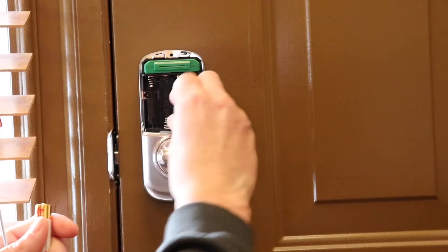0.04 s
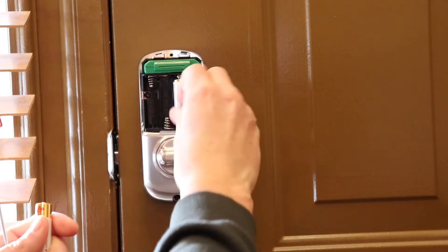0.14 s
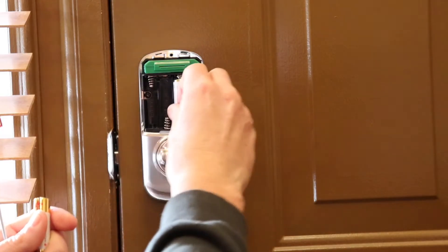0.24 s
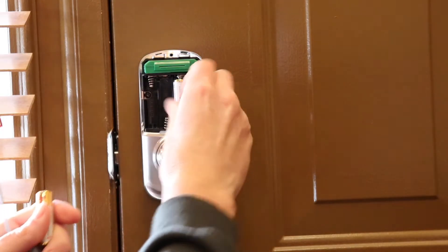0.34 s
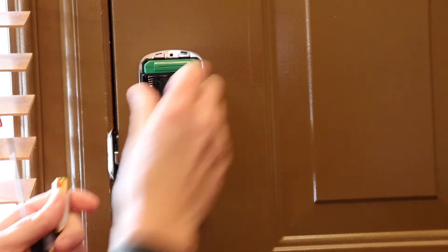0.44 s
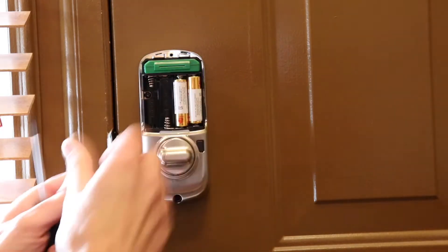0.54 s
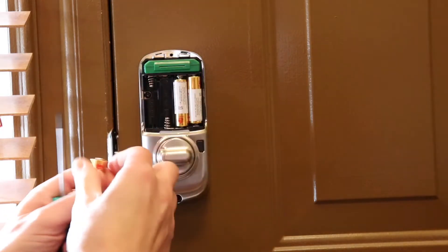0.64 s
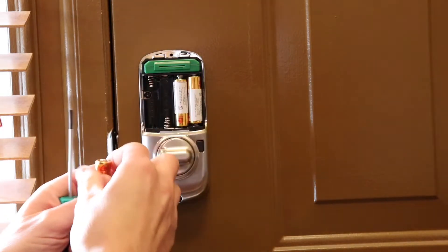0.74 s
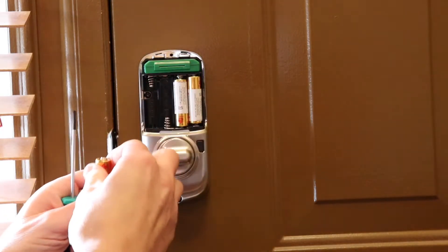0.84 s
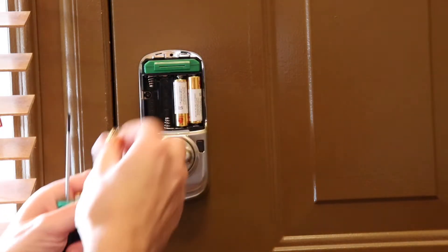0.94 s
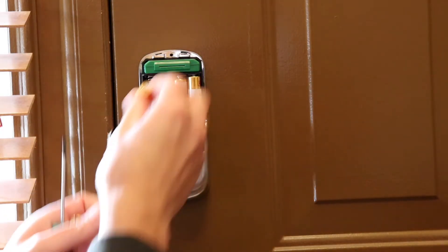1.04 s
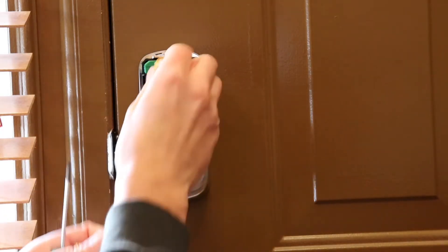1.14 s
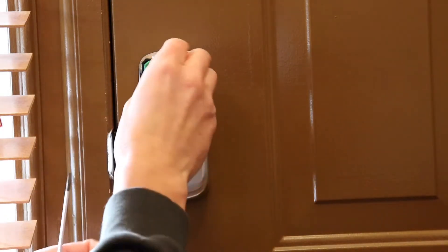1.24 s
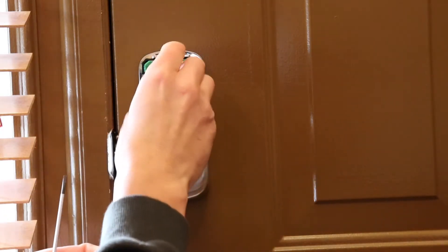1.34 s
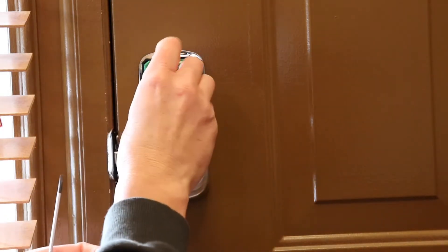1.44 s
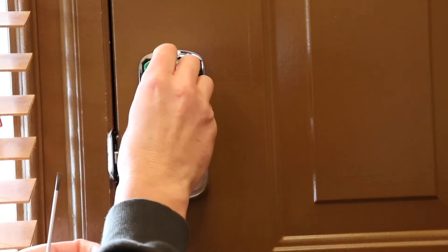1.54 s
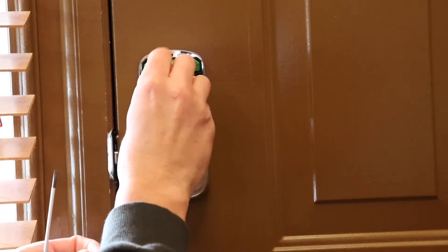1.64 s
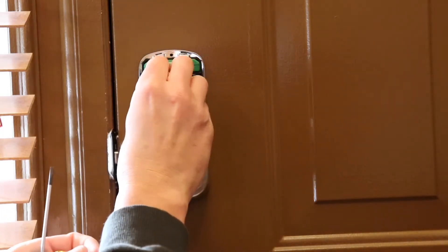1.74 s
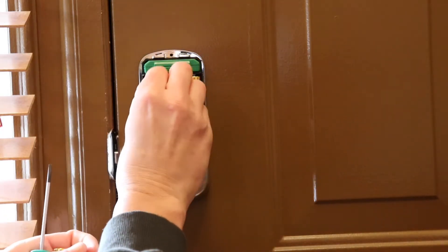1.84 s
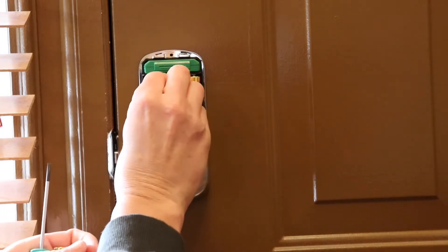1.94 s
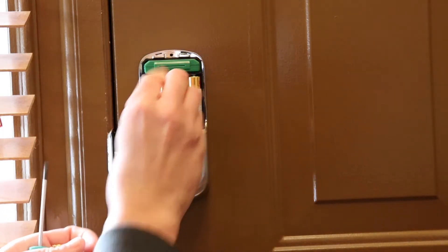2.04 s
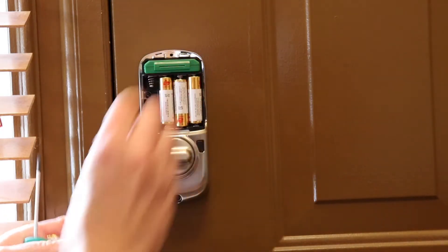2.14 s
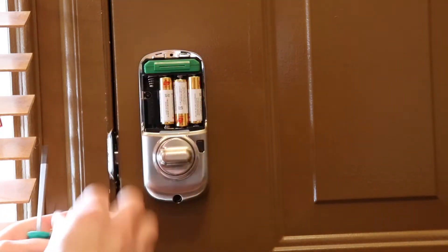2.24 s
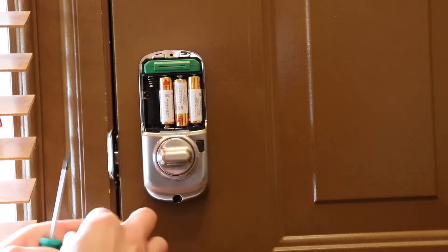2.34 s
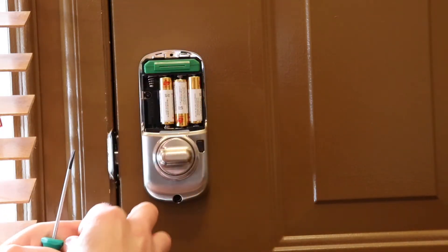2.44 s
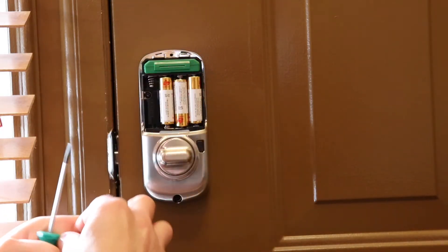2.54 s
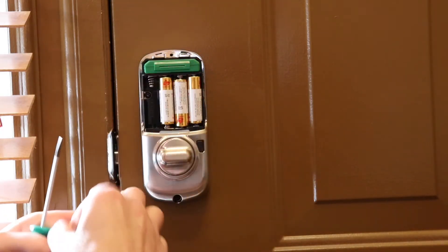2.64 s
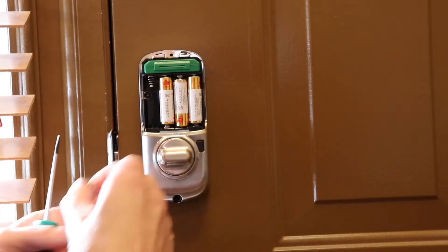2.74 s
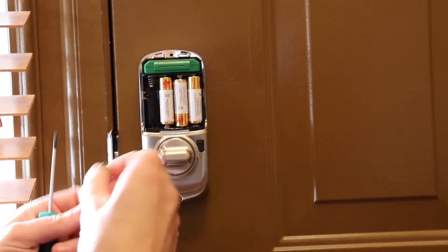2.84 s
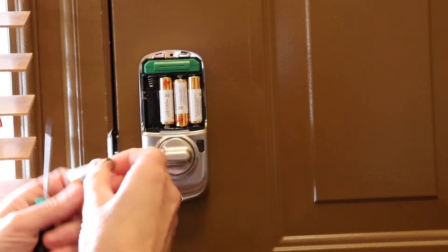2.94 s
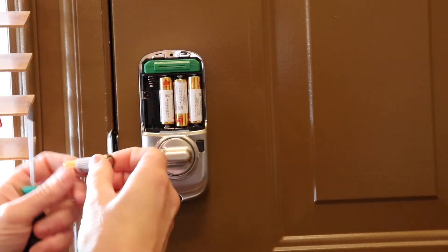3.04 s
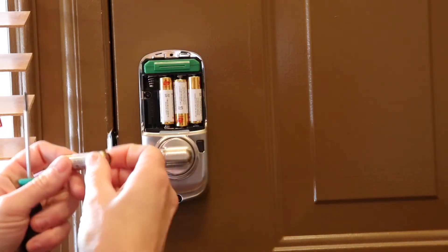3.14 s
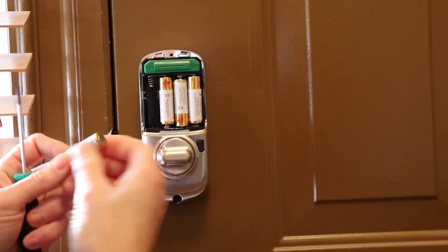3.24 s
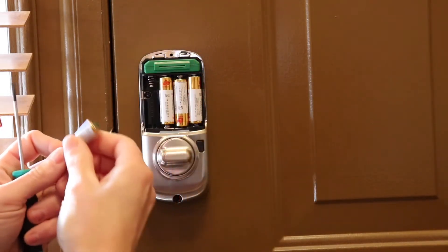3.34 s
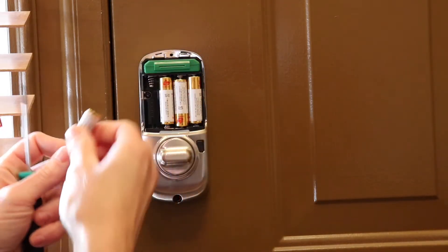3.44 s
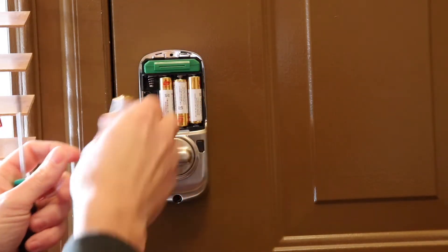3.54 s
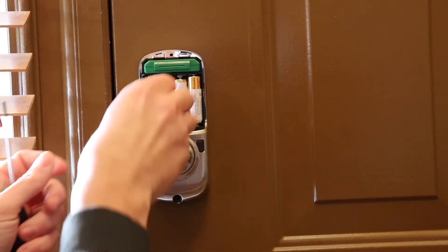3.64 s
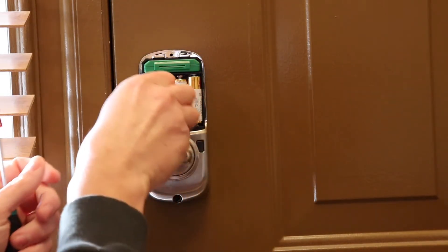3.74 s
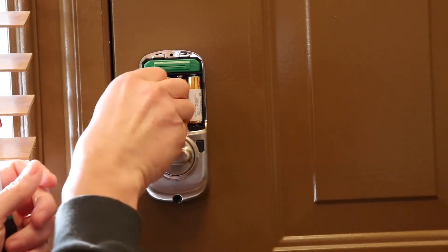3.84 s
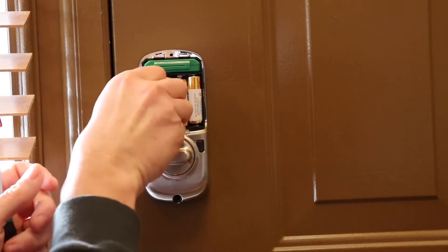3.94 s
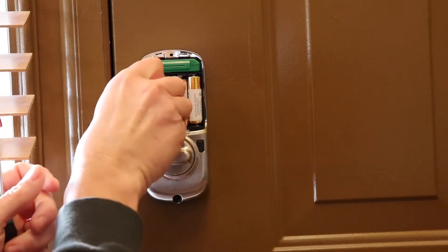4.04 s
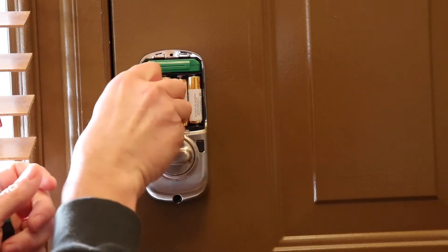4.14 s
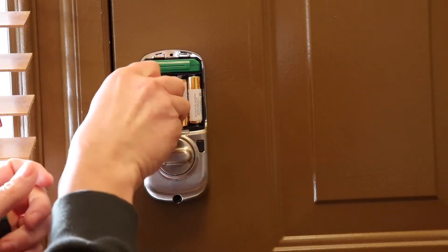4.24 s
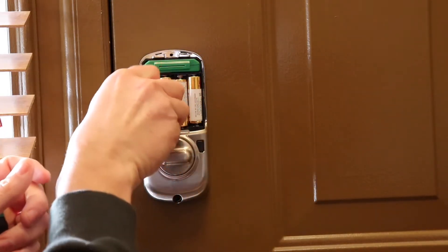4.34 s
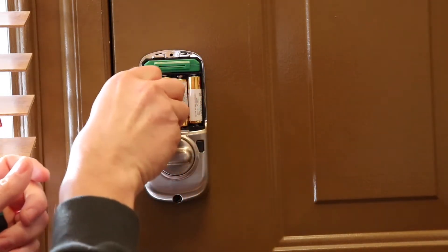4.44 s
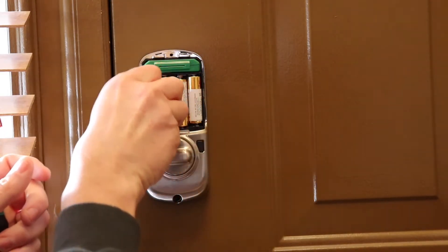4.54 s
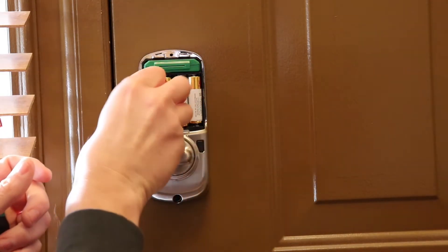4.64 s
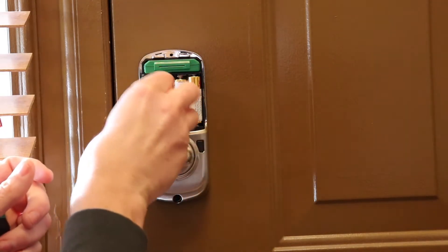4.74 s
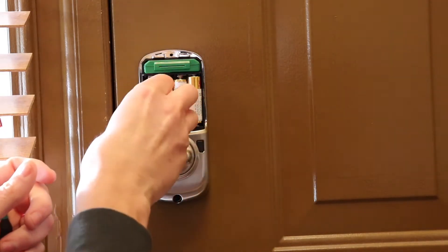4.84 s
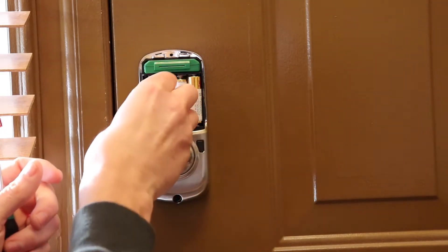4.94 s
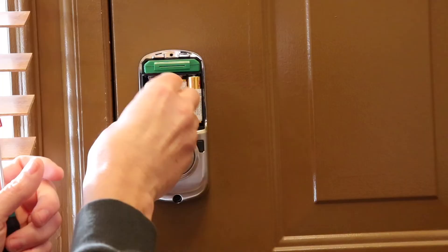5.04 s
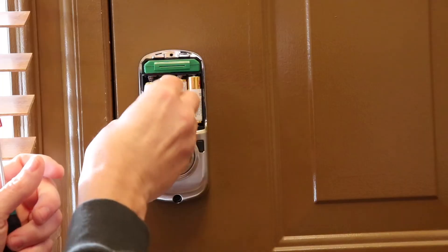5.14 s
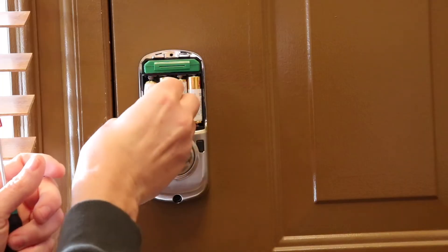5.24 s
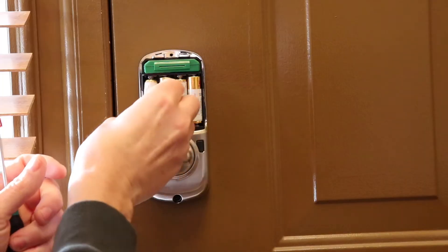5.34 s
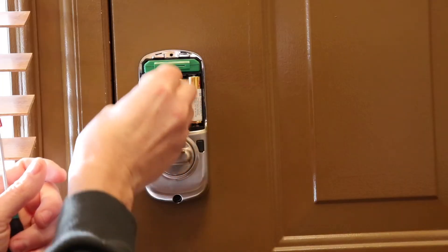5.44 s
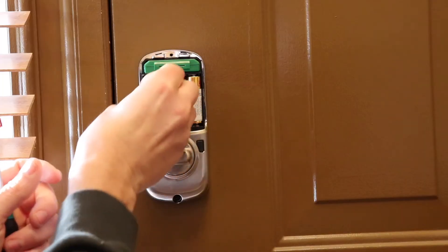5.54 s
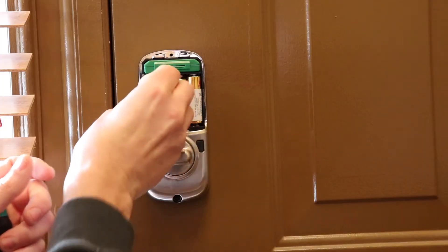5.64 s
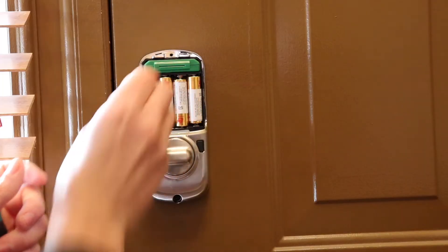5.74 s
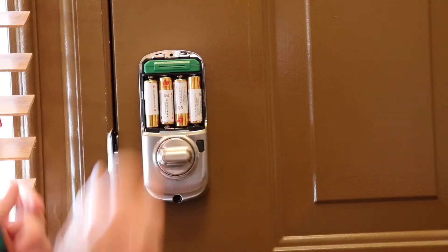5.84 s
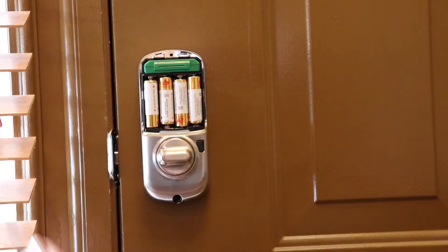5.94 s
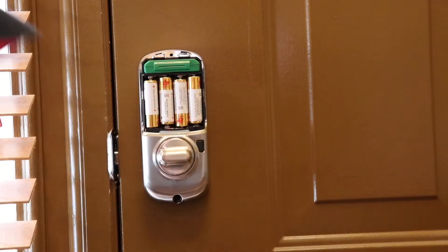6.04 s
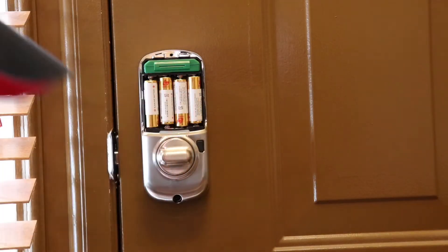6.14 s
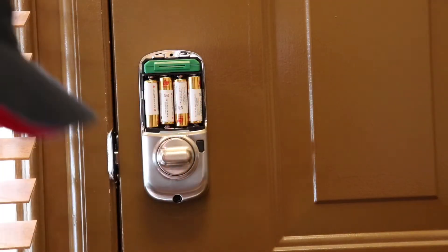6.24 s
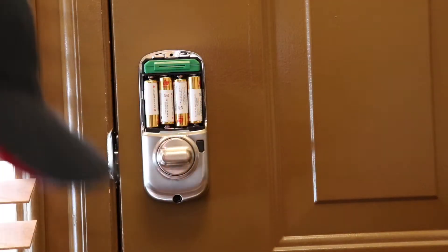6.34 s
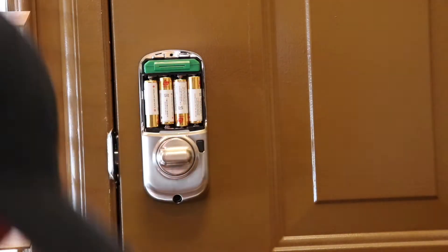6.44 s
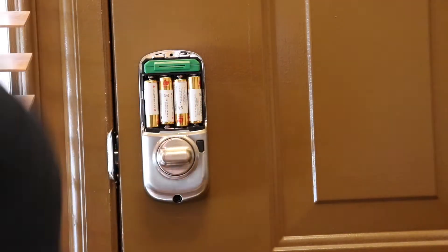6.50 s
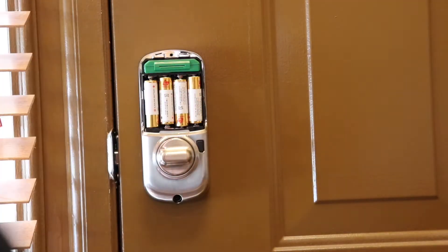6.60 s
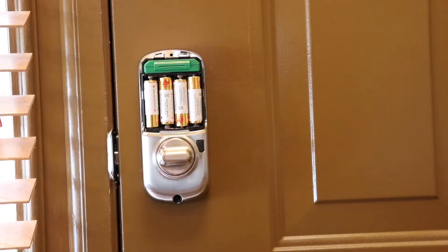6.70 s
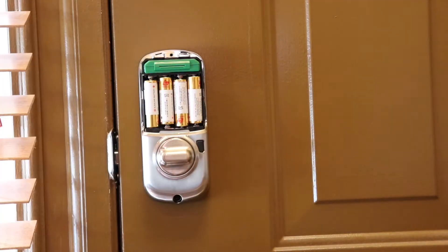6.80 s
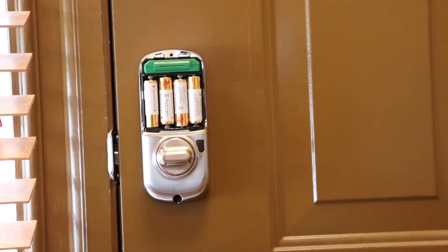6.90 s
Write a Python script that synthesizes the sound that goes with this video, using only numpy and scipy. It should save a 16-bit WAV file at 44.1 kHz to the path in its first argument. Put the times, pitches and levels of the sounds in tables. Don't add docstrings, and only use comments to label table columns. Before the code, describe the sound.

Close stereo pickup of a door lock being loaded with batteries: brief, crisp plastic snaps separated by quiet gaps, small coil squeaks and ticks, low knocks through the wooden panel. The third snap is bright and metallic; the fourth is a loud cluster with a heavy push. Short hallway echoes follow. Soft cloth rustling ends it, over steady low hiss and a barely audible high whine.

```python
import sys
import numpy as np
from scipy import signal
from scipy.io import wavfile

SR = 44100
rng = np.random.default_rng(int(sys.argv[2]) if len(sys.argv) > 2 else 0)


def attenuation_scalar(level_db):
    decades = np.asarray(level_db, float) / 20
    return 10 ** decades


def int16_out(signal):
    q = np.round(np.clip(np.atleast_2d(signal).T, -1, 1) * 32767)
    wavfile.write(sys.argv[1], SR, q.astype(np.int16))


N = 307314


def rms_one(x):
    return x / np.sqrt(np.mean(x ** 2) + 1e-20)


def peak_one(x):
    return x / np.max(np.abs(np.atleast_2d(x)[0]))


def at_hz(points, hz):
    table = np.array(points)
    return np.interp(np.log(hz), np.log(table[:, 0]), table[:, 1])


def add(track, s, sound):
    i = round(s * SR)
    track[..., i:i + sound.shape[-1]] += sound[..., :N - i]


EDGES_HZ = 22 * 2 ** np.arange(0, 9.8, 0.5)


def stereo_bands(size, likeness, gain):
    out, white = 0, rng.standard_normal((2, 2, size))
    for k, (low, high) in enumerate(zip(EDGES_HZ, EDGES_HZ[1:])):
        band = signal.butter(2, [low, high], "band", fs=SR, output="sos")
        mid, side = signal.sosfilt(band, white[k % 2])
        hz = np.sqrt(low * high)
        alike = np.sqrt(np.clip(at_hz(likeness, hz), 0, 1))
        stereo = np.sqrt(1 + alike) * mid + np.sqrt(1 - alike) * side * [[1], [-1]]
        out = out + gain(hz) * stereo
    return out


# f/Hz, level/dB
HISS_COLOUR = [(15, -38.5), (28, -3.5), (180, -2.5), (460, -5), (1200, -9), (3430, -15), (8140, -19),
               (16000, -29)]
# f/Hz, likeness (0 to 1)
HISS_LIKENESS = [(60, 0.35), (240, 0.18), (950, 0.11), (3770, 0.05), (15000, 0.021)]
# f/Hz, level/dB (rms)
WHINES = [(8000, -83), (8220, -80), (8280, -80.5)]


def floor():
    hiss_db = -56.5 + 1.5
    hiss = rms_one(stereo_bands(N, HISS_LIKENESS, lambda hz: attenuation_scalar(at_hz(HISS_COLOUR, hz))))
    t = np.arange(N) / SR
    whine = sum(np.sqrt(2) * attenuation_scalar(db) * np.sin(2 * np.pi * hz * t) for hz, db in WHINES)
    return attenuation_scalar(hiss_db) * hiss + whine


# f/Hz, t60/s
HALL_DECAY = [(100, 0.73), (420, 0.48), (1100, 0.57), (2900, 0.46), (7700, 0.42), (14000, .22)]
# f/Hz, level/dB
HALL_TONE = [(100, 2), (500, 1.6), (1500, 2.5), (4000, -3), (9000, -3), (15000, -9.5)]
# f/Hz, likeness (0 to 1)
DIFFUSE_LIKENESS = [(60, 0.98), (240, 0.88), (950, 0.14), (3770, 0.097), (15000, 0.17)]


def hallway(x):
    hall_db, far_wall_db, far_wall_s, far_spread_s = -26 - 13.5, -6.5, 0.064, 0.0089
    t = np.arange(30000) / SR
    build_up = 1 - np.exp(-t / 0.021)
    echo = attenuation_scalar(far_wall_db) * np.exp(-0.5 * ((t - far_wall_s) / far_spread_s) ** 2)
    fading = lambda hz: attenuation_scalar(at_hz(HALL_TONE, hz) - 60 * t / at_hz(HALL_DECAY, hz))
    tail = stereo_bands(len(t), DIFFUSE_LIKENESS, fading)
    return signal.fftconvolve(x[None], attenuation_scalar(hall_db) * (build_up + echo) * tail)[:, :N]


def rubbing(strokes, rise_db, fall_db, colour, puff_db):
    s, db = np.transpose(strokes)[:, :, None]
    start = s.min() - 0.25
    t = np.arange(start, s.max() + 0.3, 1 / SR)
    strokes_db = db - rise_db * np.clip(s - t, 0, None) - fall_db * np.clip(t - s, 0, None)
    level_db = np.max(strokes_db, axis=0)
    puffs = np.interp((t - start) * 30, np.arange(60), rng.standard_normal(60))
    noise = rms_one(stereo_bands(len(t), DIFFUSE_LIKENESS, lambda hz: attenuation_scalar(at_hz(colour, hz))))
    out = np.zeros((2, N))
    add(out, start, attenuation_scalar(level_db + puff_db * puffs) * noise)
    return out


# t/s, level/dB
SLEEVE_SWEEPS = [
    (5.96, -56),
    (6.08, -54),
    (6.33, -51.5),
    (6.4, -52.5),
    (6.52, -50.5),
    (6.64, -53.5),
    (6.8, -56),
    (6.95, -58),
]
# f/Hz, level/dB per Hz
CLOTH_COLOUR = [(120, -34), (200, -5.5), (560, -4), (1050, -12.5), (1330, -8), (1490, -11), (1980, -8.5),
                (15000, -25.5)]


def sleeve():
    return rubbing(SLEEVE_SWEEPS, 69, 47, CLOTH_COLOUR, puff_db=1.5)


# t/s, level/dB
FINGER_RUBS = [
    (4.55, -56),
    (4.7, -56.5),
    (4.85, -61.5),
    (5.028, -61),
    (5.22, -54),
    (5.32, -53),
    (5.56, -52),
    (5.68, -52.5),
    (5.8, -60.5),
]
# f/Hz, level/dB per Hz
FINGER_TONE = [(18, -19.5), (30, -3), (58, -1.5), (473, -12.5), (751, -3), (955, -28.5), (2500, -18),
               (3400, -70)]


def fingers():
    return rubbing(FINGER_RUBS, 200, 125, FINGER_TONE, puff_db=2.2)


# t/s, level/dB (peak)
HAND_LEANS = [
    (1.45, -52),
    (5.058, -46),
    (5.125, -48),
    (5.25, -45),
    (5.3, -44),
    (5.367, -27),
    (5.668, -39),
    (5.708, -42),
    (5.75, -47),
    (5.82, -51),
]


def leaning():
    sway_hz, sway_s = 52, 0.012
    out, t = np.zeros(N), np.arange(-2000, 2000) / SR
    sway = np.exp(-0.5 * (t / sway_s) ** 2) * np.cos(2 * np.pi * sway_hz * t)
    for s, db in HAND_LEANS:
        add(out, s + t[0], attenuation_scalar(db) * sway)
    return out


# t/s, level/dB (peak)
DOOR_PUSHES = [(0.054, -33), (0.08, -19), (0.095, -23.5), (0.113, -21.5), (1.588, -36.5), (1.657, -30.5),
               (1.796, -28), (1.816, -25.5), (2.051, -60), (3.756, -37.5), (3.9, -36.5), (4.09, -42.5),
               (4.296, -34.5), (4.33, -41), (4.41, -34.5), (4.53, -48), (5.02, -45), (5.05, -42.5),
               (5.12, -42.5), (5.19, -37.5), (5.244, -37), (5.298, -41.5), (5.357, -22), (5.385, -29),
               (5.409, -22), (5.641, -44), (5.661, -37), (5.7, -57)]
# f/Hz, level/dB, t60/s
DOOR_MODES = [(43.3, -2.5, 0.11), (65.3, -1.9, 0.073), (122, -8, 0.13), (158.8, -3.5, .12), (217, 1.5, 0.1),
              (281.3, 1, 0.11), (358.4, -1.5, 0.092), (445.6, -1, 0.16), (533, 2, 0.093), (760, -2, 0.076)]
THUD_BAND = signal.butter(2, [40, 900], "band", fs=SR, output="sos")


def door():
    soft_hz, thud_db, thud_s = 378.3, -8.5, 0.028
    out, t = np.zeros(N), np.arange(SR // 4) / SR
    swell = 1 - np.exp(-t / 0.0076)
    for s, db in DOOR_PUSHES:
        chance = rng.standard_normal((len(DOOR_MODES), 2)) * [1.5, 1]
        modes = 0
        for (hz, mode_db, t60), (extra_db, phase) in zip(DOOR_MODES, chance):
            strength = attenuation_scalar(mode_db + extra_db - 60 * t / t60) / (1 + (hz / soft_hz) ** 2)
            modes = modes + strength * np.sin(2 * np.pi * hz * t + phase)
        thud = rms_one(signal.sosfilt(THUD_BAND, rng.standard_normal(len(t)))) * np.exp(-t / thud_s)
        add(out, s, attenuation_scalar(db - 4.5) * (peak_one(modes * swell) + attenuation_scalar(thud_db) * thud * swell))
    return out


def resonance(x, hz, width_hz):
    r = np.exp(-np.pi * width_hz / SR)
    feedback = [1, -2 * r * np.cos(2 * np.pi * hz / SR), r * r]
    return signal.lfilter([(1 - r * r) / 2, 0, (r * r - 1) / 2], feedback, x)


def body(x, peaks):
    return sum((-1) ** k * attenuation_scalar(db) * resonance(x, hz, width) for k, (hz, width, db) in enumerate(peaks))


def spread(rung, plain, width):
    mid, side = peak_one(rung)[:2]
    click = plain * np.sqrt(np.sum(mid ** 2) / np.sum(plain ** 2))
    return np.array([mid + width * side, mid - width * side, 0.34 * mid + 0.67 * click])


# f/Hz, width/Hz, level/dB
HOUSING_PEAKS = [(740, 120, -4.5), (1508, 160, -3), (1710, 240, -6.5), (2048, 110, -3.5)]
# f/Hz, width/Hz, level/dB
CONTACT_PEAKS = [(4120, 590, 5.5), (6690, 750, 3.5), (7700, 720, -5), (9230, 320, -0.5), (11500, 420, -30),
                 (11900, 1100, -22)]
BAY_BAND = signal.butter(3, [2700, 5600], "band", fs=SR, output="sos")
HOUSING_BAND = signal.butter(2, [550, 2300], "band", fs=SR, output="sos")
METAL_BAND = signal.butter(2, [5000, 11500], "band", fs=SR, output="sos")


def contact(envelope, db, bay, housing, housing_db, contacts_db):
    force = envelope * rng.standard_normal((3, len(envelope)))
    force[0, 12] += 3.5
    force[2] = np.arange(len(envelope)) == 12
    wide, dull, bright = [signal.sosfilt(band, force) for band in (BAY_BAND, HOUSING_BAND, METAL_BAND)]
    bay_ring = resonance(resonance(force, *bay), *bay)
    air = spread(bay_ring + 0.15 * wide, wide[2], 0.48)
    plastic = spread(body(dull, housing) + 0.18 * dull, dull[2], 0.45)
    metal = spread(body(bright, CONTACT_PEAKS) + 0.38 * bright, bright[2], 0.49)
    return attenuation_scalar(db) * (air + attenuation_scalar(housing_db) * plastic + attenuation_scalar(contacts_db) * metal)


T_MS = np.arange(2600) / SR * 1000


def rattle(ms):
    return (1 - np.exp(-T_MS / 0.27)) * (np.exp(-T_MS / abs(ms)) + 0.06 * np.exp(-T_MS / 7))


def scrape(ms):
    return (1 - np.exp(-T_MS / 0.57)) * np.exp(-np.clip(T_MS - ms, 0, None) / 1.6)


# from t/s, f/Hz
BAY_SLOTS = [
    (0, 3050),
    (1.0, 3490),
    (3.0, 3200),
    (4.45, 3370),
    (5.0, 3350),
    (5.38, 2950),
]


def bay_hz(s):
    return [hz for start, hz in BAY_SLOTS if start <= s][-1]


# t/s, f/Hz, level/dB, t60/s
COIL_RINGS = [
    (1.589, 1497, -41.5, .28),
    (1.669, 1497, -44, .26),
    (4.532, 3370, -47.5, .42),
]
# t/s, f/Hz, level/dB, t60/s
END_CLIP_RINGS = [
    (5.3921, 6750, -6.5, .009),
    (4.2902, 6850, -18.5, 0.017),
    (1.8136, 3450, -5.5, .006),
]


def metal_rings():
    out, t = np.zeros((3, N)), np.arange(SR // 2) / SR
    for s, hz, db, t60 in [*COIL_RINGS, *END_CLIP_RINGS]:
        beating = np.sin(2 * np.pi * hz * t) + 0.5 * np.sin(2 * np.pi * (hz + 19) * t)
        add(out, s, attenuation_scalar(db - 60 * t / t60) * beating * np.array([[1], [1], [0.3]]))
    return out


# t/s, bay level/dB (peak), housing f/Hz, housing level/dB (relative), rattle decay/ms
HOUSING_KNOCKS = [(1.5888, -32.5, 1425, 7, 2.9), (3.7504, -58.5, 840, 17.5, 3.1),
                  (3.879, -56, 718, 12.5, 7.3), (3.9, -40, 832, 8, 5.2), (4.085, -40, 778, 12.5, 6.3),
                  (4.4069, -23.5, 1970, -3, 5.3), (5.125, -55, 665, 9, 2.5), (5.191, -60.5, 608, 19, 6.3),
                  (5.245, -71, 740, 25.5, 6.2), (5.375, -27, 746, 7, 3.4), (5.409, -30, 760, 9.5, 3.7),
                  (5.465, -33, 720, 5, 9)]


def knocks():
    out = np.zeros((3, N))
    for s, db, hz, housing_db, ms in HOUSING_KNOCKS:
        housing = [*HOUSING_PEAKS, (hz, 180, 6), (2400, 900, 1.5)]
        add(out, s, contact(rattle(ms), db, (3050, 1150), housing, housing_db, housing_db - 26))
    return out


# t/s, bay level/dB (peak), contacts level/dB (relative), length/ms
COIL_SQUEAKS = [
    (1.49, -44, -5.5, 13),
    (1.805, -26, -7.5, 3.8),
    (4.145, -48, -11, 39),
    (4.18, -51.5, -11, 29),
    (4.5232, -24.5, -0.5, 15.2),
    (4.8514, -56, -9, 12),
    (4.89, -55.5, -5.5, 24),
    (5.3468, -31.5, -4, 17),
    (1.797, -34, -9.5, 7.8),
    (5.37, -35.5, -10, 12),
]


def squeaks():
    out = np.zeros((3, N))
    for s, db, contacts_db, ms in COIL_SQUEAKS:
        housing_db = -15 - contacts_db
        add(out, s, contact(scrape(ms), db, (bay_hz(s), 120), HOUSING_PEAKS, housing_db, contacts_db))
    return out


# t/s, bay level/dB (peak), housing level/dB (relative), length/ms
SPRING_SLIDES = [
    (0.073, -27, -4, 1.8),
    (0.1095, -18.5, -1, 5.5),
    (0.115, -27.5, -6, 3.2),
    (1.713, -42, -12, 19.4),
    (1.789, -42.5, -8.5, 3),
    (4.4884, -38.5, -10, 7.9),
    (4.7, -46.5, -1, 31),
    (5.2614, -59, -0.5, 13),
    (5.404, -14.5, -10.5, 2.1),
    (6.845, -41, -11, 25),
]


def slides():
    out = np.zeros((3, N))
    for s, db, housing_db, ms in SPRING_SLIDES:
        add(out, s, contact(scrape(ms), db, (bay_hz(s), 2400), HOUSING_PEAKS, housing_db, -3.5))
    return out


# t/s, bay level/dB (peak), housing and contacts level/dB (relative), rattle decay/ms
FINGER_CRACKS = [(0.0845, -17.5, 2, -17, 4.6), (0.1228, -3, -30, -14, 0.7), (1.6545, -24, -9, -11, 7),
                 (1.8162, -16, 1.5, -6, 2.9), (3.918, -43.5, 5, -1, 2.4), (4.2895, -11.5, -25, 6.5, 1.3),
                 (4.3615, -30.5, -19, -12.5, 1.3), (5.3697, -16.5, -5, -10, 1.6),
                 (5.3916, -19.5, -13, 12.5, 0.95), (5.396, -33.5, -5, 15.5, 2.5),
                 (5.411, -13, 0.5, -2, 1.1)]


def cracks():
    out = np.zeros((3, N))
    for s, db, housing_db, contacts_db, ms in FINGER_CRACKS:
        bay = (bay_hz(s) - 33 * housing_db, 2000)
        add(out, s, contact(rattle(ms), db, bay, HOUSING_PEAKS, housing_db, contacts_db))
    return out


# t/s, bay level/dB (peak), housing and contacts level/dB (relative), rattle decay/ms
BATTERY_SNAPS = [
    (0.0778, -7, -9, -22, 0.8),
    (0.08, -15, -7.5, -13, 3.8),
    (1.7935, -16, -9, -28, 0.6),
    (1.8134, -1.5, -14, -14, 0.66),
    (3.9403, -39, -20, -0.5, 3.8),
    (4.663, -41, -5, -11, 1.3),
    (5.333, -41.5, -4, -8.5, 1.5),
    (5.3553, -22, -4.5, -24.5, 2.2),
    (5.4062, 1.5, -13.5, -2, 1.1),
    (4.291, -10.5, -17, 3.5, 4.1),
]


def snaps():
    out = np.zeros((3, N))
    for s, db, housing_db, contacts_db, ms in BATTERY_SNAPS:
        add(out, s, contact(rattle(ms), db, (bay_hz(s), 710), HOUSING_PEAKS, housing_db, contacts_db))
    return out


def scene():
    lock = snaps() + cracks() + slides() + squeaks() + knocks() + metal_rings()
    panel = door()
    echo = hallway(lock[2] + panel)
    return lock[:2] + panel + leaning() + echo + fingers() + sleeve() + floor()


def top_cut(x):
    return signal.sosfilt(signal.butter(12, 16850, fs=SR, output="sos"), x)


def record(dry):
    ceiling = 0.99
    rounded = dry / (1 + np.abs(dry / ceiling) ** 6) ** (1 / 6)
    return top_cut(rounded)


dry = scene()
out = record(dry)
int16_out(out)
```